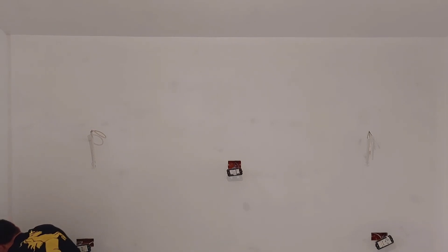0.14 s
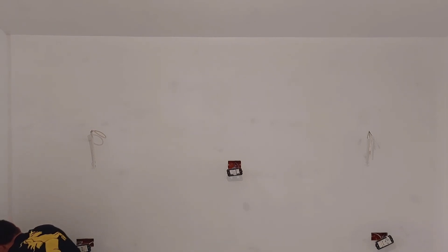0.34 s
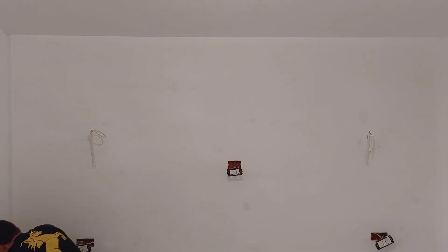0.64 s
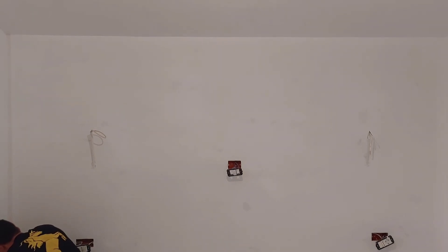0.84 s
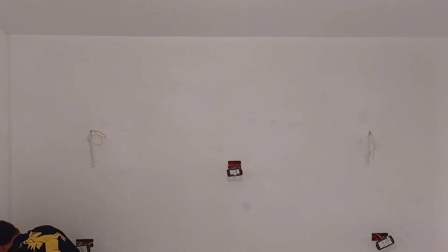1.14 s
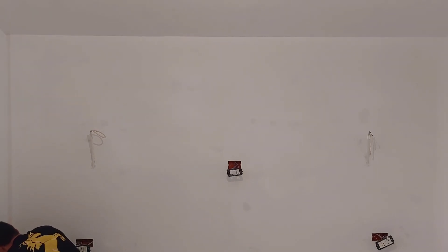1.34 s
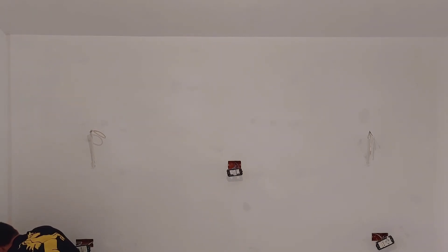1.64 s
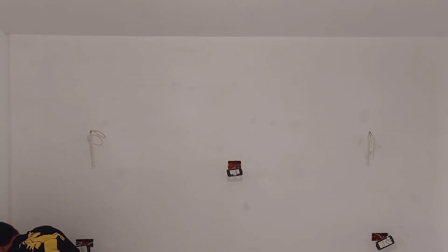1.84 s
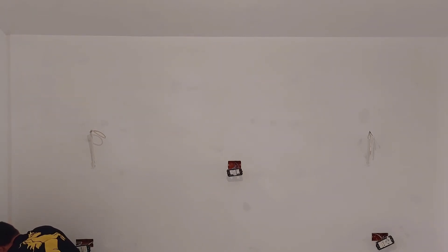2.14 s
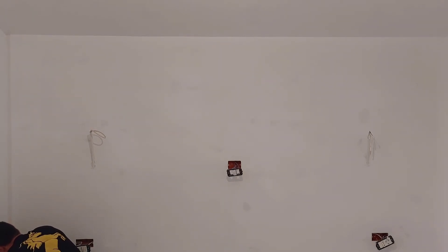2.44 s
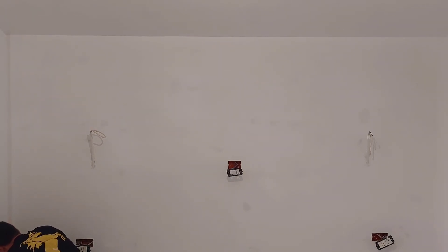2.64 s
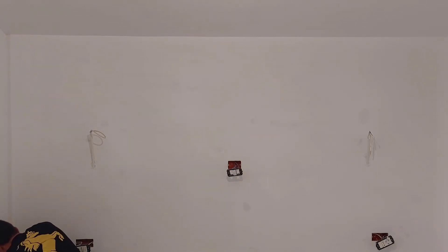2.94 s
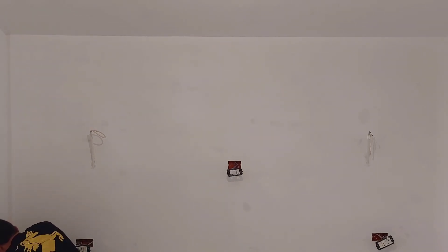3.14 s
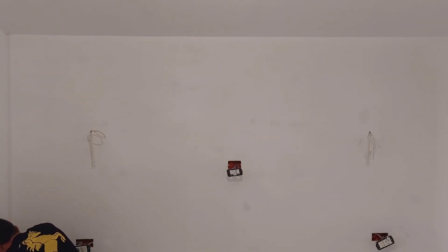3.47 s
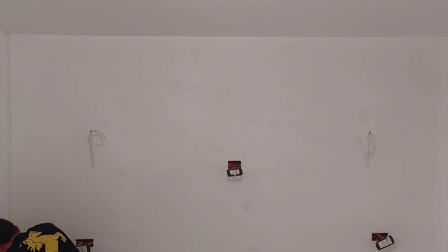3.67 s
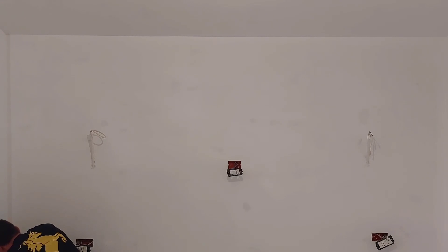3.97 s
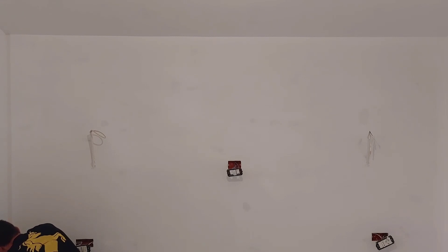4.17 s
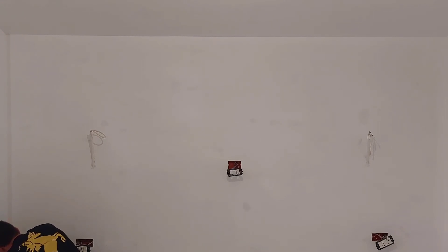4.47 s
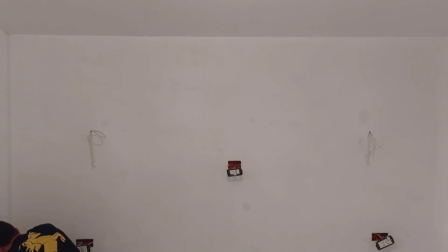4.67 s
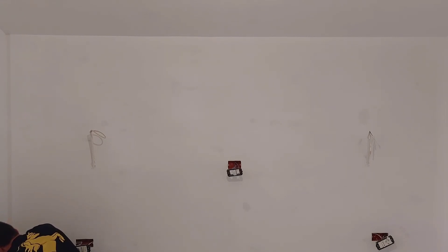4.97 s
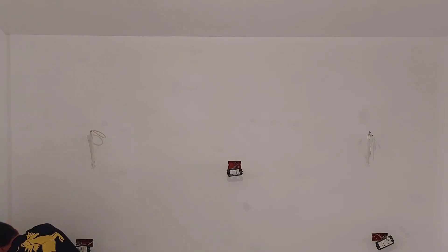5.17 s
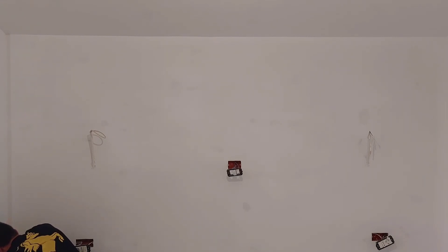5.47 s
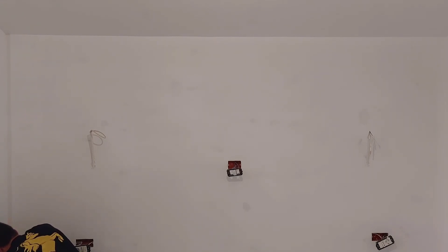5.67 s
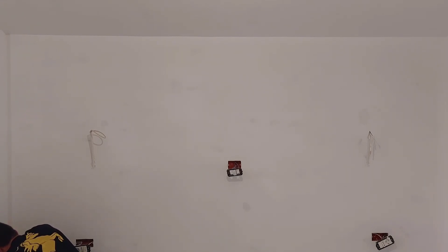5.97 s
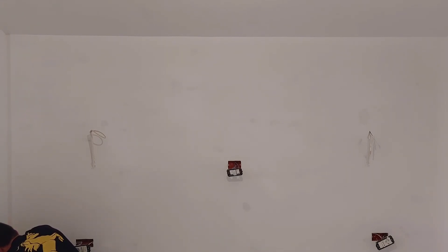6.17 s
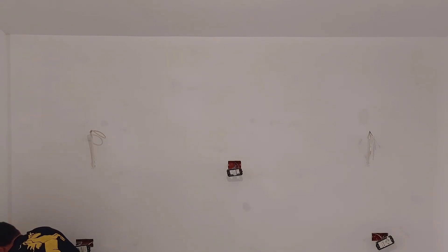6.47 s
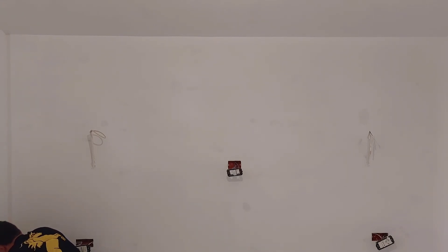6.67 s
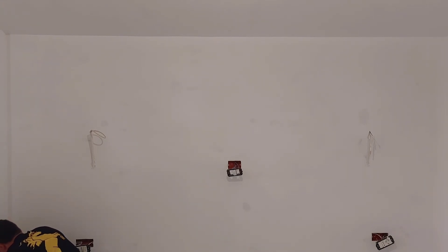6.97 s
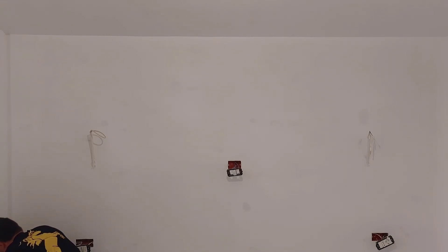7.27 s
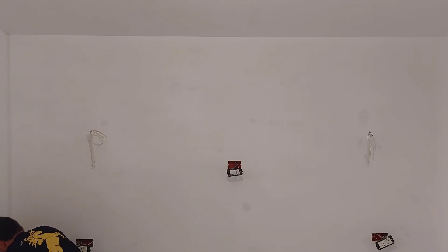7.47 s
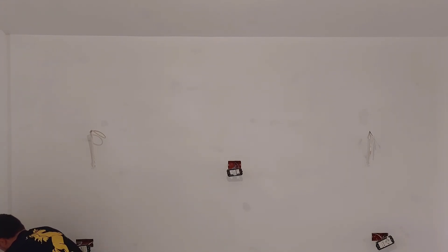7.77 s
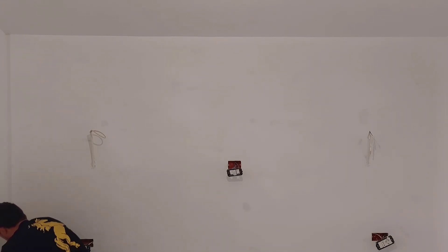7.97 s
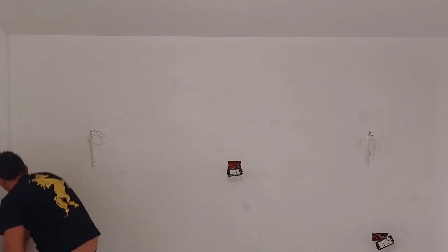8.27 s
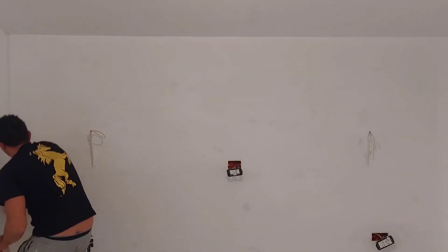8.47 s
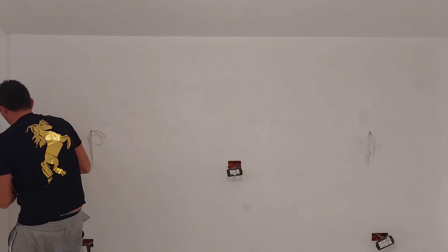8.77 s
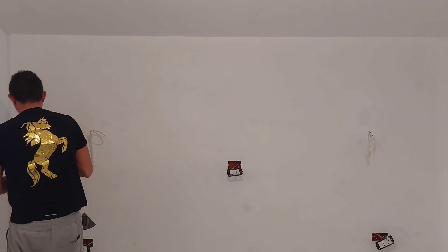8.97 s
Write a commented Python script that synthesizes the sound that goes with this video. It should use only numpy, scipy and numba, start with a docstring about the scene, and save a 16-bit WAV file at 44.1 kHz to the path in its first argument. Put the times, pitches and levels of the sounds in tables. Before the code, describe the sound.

A bare, reverberant room with faint still air, picked up by one phone microphone; its noise suppression shortens the echo tails. A worker crouches low at a wall with masking tape. A faint squeaky remnant opens; at 0.7 s a short fizzing pull rasps. Around 1.9-2.05 s backing crackles and snaps sharply, leaving squeaks and ringing. At 3.15-3.3 s comes a dense, hard burst of rips, then another at 3.6-3.8 s with a hollow roll knock and groan. At 4.9-5.1 s there are light papery cracks, then hoarse squeaky rubbing strokes until about 6.15 s, ended by a sharp snap. Pulls resume from 6.55 s, growing stronger around 6.8-7.25 s; hollow knocks at 7.35 s and a loud rip at 7.52 s ring out, with another knock at 7.86 s. From 8.2 s to about 8.9 s low, dry thuds mark the worker rising and stepping, over faint peeling and squeaks.

```python
"""Bare room with hard walls, low at one wall, one phone microphone: masking tape is jerked off its roll.
Short strips are pulled and rubbed down. The glue lets go in dense tiny fractures that fizz, snap the
backing and shake the taut strip; strip and roll squeak and groan, and the card roll knocks hollowly.
The walls ring on after every pull, built from decaying noise; the worker gets up with a few thuds.
The phone's noise suppressor shortens the tails."""
import sys
import numpy as np
from scipy import signal
from scipy.fft import rfft, irfft, next_fast_len
from scipy.io import wavfile
from scipy.ndimage import uniform_filter1d, minimum_filter1d
from numba import njit

SR = 44100
rng = np.random.default_rng(int(sys.argv[2]) if len(sys.argv) > 2 else 0)


def generate_wav(signal):
    """Clip the signal to [-1, 1] and save it as 16-bit WAV at the path in sys.argv[1]."""
    frames = np.transpose(np.atleast_2d(signal))
    scaled = np.clip(frames, -1, 1) * 32767
    pcm = np.round(scaled).astype(np.int16)
    wavfile.write(sys.argv[1], SR, pcm)


N = 401751
T = np.arange(N) / SR
TOP_HZ = 15800  # top of the microphone's band; squeaks centred above it are left out


def undb(db):
    """Decibels to gain."""
    return 10 ** (np.asarray(db) / 20)


def on_log_axis(hz, points, values):
    """Join points by straight lines over log frequency."""
    return np.interp(np.log(np.maximum(hz, 1)), np.log(points), values)


def colour(x, spectrum, size=2048):
    """Causal minimum-phase filter of unit power gain with the given (f/Hz, level/dB) shape."""
    gain = undb(on_log_axis(np.fft.rfftfreq(size, 1 / SR), *np.transpose(spectrum)))
    cepstrum = irfft(np.log(gain))
    cepstrum[1:size // 2] *= 2  # fold onto positive time
    cepstrum[size // 2 + 1:] = 0
    response = irfft(np.exp(rfft(cepstrum)))
    return signal.fftconvolve(x, response / np.linalg.norm(response))[:len(x)]


def add(track, s, sound):
    """Mix a sound into a track from time s on, cutting what falls outside."""
    start = int(s * SR)
    sound, start = sound[max(-start, 0):], max(start, 0)
    part = track[..., start:start + len(sound)]
    part += sound[:part.shape[-1]]


def wander(hz, size=N, order=4):
    """Complex random motion of unit power, about hz fast."""
    f = np.fft.fftfreq(next_fast_len(size), 1 / SR)
    spectrum = np.exp(2j * np.pi * rng.random(len(f))) / np.sqrt(1 + np.abs(f / hz) ** order)
    z = np.fft.ifft(spectrum)[:size]
    return z / np.std(z)


def resonate(x, modes):
    """Ring a table of steep resonances: f/Hz, width/Hz, level/dB."""
    out = 0
    for hz, width, db in modes:
        peak = signal.iirpeak(hz, hz / width, fs=SR)
        once = signal.lfilter(*peak, x)
        out = out + undb(db) * signal.lfilter(*peak, once)
    return out


# Still air of the house, relative spectrum: f/Hz, level/dB
AIR_TONE = [(15, -70), (25, -37), (59, -5), (175, -17.5), (277, -16), (531, -14), (624, -13), (1890, -20.5),
            (3340, -25.5), (3620, -29.5), (14300, -30), (16000, -56)]
AIR_DB = -51.5  # overall level


def still_air():
    """Steady noise in the colour of the house at rest."""
    return undb(AIR_DB) * colour(rng.standard_normal(N), AIR_TONE)


# Low background noise, course of its level: t/s, level/dB
LOW_NOISE_LEVEL = [(0, -66.5), (4.4, -78), (5.2, -58), (6.3, -52.5), (7.0, -54.5), (7.6, -44), (8.5, -48),
                   (9.1, -68)]
# Its dull colour, relative spectrum: f/Hz, level/dB
LOW_NOISE_TONE = [(25, -10.5), (60, 0), (150, -1), (300, -6), (700, -9.5), (3000, -37), (16000, -52.5)]


def low_noise(flutter_hz=9, flutter_db=2):
    """Dull, uneven low background noise: filtered noise whose level sinks, then rises, and flutters."""
    db = np.interp(T, *np.transpose(LOW_NOISE_LEVEL)) + flutter_db * wander(flutter_hz).real
    return undb(db) * colour(rng.standard_normal(N), LOW_NOISE_TONE)


# Soft rumbles as the worker leans and shifts weight: t/s, length/s, f/Hz, level/dB
LEANS = [(.8, 0.39, 164, -61), (2.46, 0.15, 73.4, -54), (2.58, 0.18, 182, -54.5), (2.75, 0.19, 77, -52),
         (2.8, .19, 183, -55), (8.221, 0.42, 75.2, -45), (8.69, .2, 71, -40.5)]
RUMBLE_WIDTH_HZ = 12


def rumbles():
    """Low swells without a blow: narrow noise under a half-sine."""
    out = np.zeros(N)
    for s, length, hz, db in LEANS:
        t = T[:int(length * SR)]
        ring = wander(RUMBLE_WIDTH_HZ, size=SR)[:len(t)] * np.exp(2j * np.pi * hz * t)
        swell = ring.real * np.sin(np.pi * t / length)
        add(out, s, swell * undb(db) / np.std(swell))
    return out


def bump(hz, rise_cycles):
    """A soft blow on a heavily damped resonance; lower ones swell and fade more slowly."""
    rise = rise_cycles / hz
    t = T[:int(10 * rise * SR)]
    return t / rise * np.exp(1 - t / rise) * np.sin(2 * np.pi * hz * t)


# Dull thuds as the worker shifts, gets up and steps: t/s, f/Hz, level/dB
FLOOR_THUDS = [(4.944, 71, -43), (7.068, 89, -40.5), (7.24, 64, -39.5), (8.272, 89, -23.5),
               (8.335, 80, -29), (8.377, 59, -31), (8.43, 79.5, -37), (8.587, 67.7, -37),
               (8.719, 63.4, -26), (8.78, 55, -26.5), (8.829, 68.2, -32), (8.881, 66.6, -27.5)]
THUD_RISE_CYCLES = 0.42


def thuds():
    """Low damped blows that stay dry, with no wall echo."""
    out = np.zeros(N)
    for s, hz, db in FLOOR_THUDS:
        add(out, s, undb(db) * bump(hz, THUD_RISE_CYCLES))
    return out


# The bare room: f/Hz, t60/s, echo energy/dB against the sound sent to the walls
ROOM_DECAY = [(85, 1.1, -9.5), (180, 2.4, 3), (330, 1.2, 4), (520, 1.8, 0.5), (660, 2.1, -4.5),
              (830, 2.2, -1), (1550, 1.86, 5.5), (2590, 1.525, -2), (5630, 1.405, -0.5), (9300, 0.9, -2.5),
              (15000, 0.6, -9)]


def echoes(first_s=0.0066, build_s=0.015, size=512):
    """Dense wall echoes: noise that builds up after a short gap and decays at each band's own rate."""
    f, t, cells = signal.stft(rng.standard_normal(2 * SR), SR, nperseg=size)
    hz, t60, echo_db = np.transpose(ROOM_DECAY)
    decay = np.log(1000) / on_log_axis(f, hz, t60)[:, None]
    gain = undb(on_log_axis(f, hz, echo_db))[:, None] * np.sqrt(2 * decay / SR)
    tail = signal.istft(cells * gain * np.exp(-decay * t), SR, nperseg=size)[1]
    return tail * (1 - np.exp(-np.maximum(T[:len(tail)] - first_s, 0) / build_s))


def room(x, count=5, shift_s=.045):
    """Hands and strip keep moving, so the sound glides from one pattern of echoes to the next."""
    out = np.zeros(N)
    for place in range(count):
        distance = np.abs((T / shift_s - place) % count - count / 2)
        share = np.cos(np.pi / 2 * np.minimum(distance, 1))
        out += signal.fftconvolve(x * share, echoes())[:N]
    return out


# Hollow knocks of the card roll: t/s, f/Hz, level/dB
ROLL_KNOCKS = [(3.796, 430, -20.5), (3.832, 173, -44.5), (7.328, 454, -13.5), (7.344, 460, -14),
               (7.424, 980, -11), (7.855, 510, -12), (7.869, 189.2, -25), (8.937, 740, -34.5)]
KNOCK_RISE_CYCLES, KNOCK_SEND_DB = 0.82, -6.5


def knocks():
    """Damped blows on the roll; returns the direct sound and what goes to the walls."""
    out = np.zeros(N)
    for s, hz, db in ROLL_KNOCKS:
        add(out, s, undb(db) * bump(hz, KNOCK_RISE_CYCLES))
    return np.array([out, undb(KNOCK_SEND_DB) * out])


# Tape rubbed down with a hoarse squeak, one list a stroke: t/s, level/dB before the gains below, f/Hz
RUB_STROKES = [
    [(4.96, -44, 1453), (5.024, -38, 1486), (5.244, -43, 1446), (5.368, -45.5, 1516), (5.436, -43.5, 1476),
     (5.49, -58, 1487)],
    [(5.63, -59.5, 1450), (5.652, -49, 1432), (5.738, -37.5, 1428), (5.904, -32, 1444), (6.146, -54, 1453),
     (6.16, -46, 1496)],
]
# Resonances of the rubbed tape: multiple of the stroke's f, level/dB
RUB_MODES = [(1, 2), (.75, -14.5), (1.16, -9.5), (2.13, -35)]


def rubbing(width_hz, direct_db, send_db, skirt_hz=450, skirt_db=-20):
    """Uneven friction keeps a few gliding resonances ringing over a faint broad scrape."""
    rings = [wander(width_hz, order=7) for _ in RUB_MODES]
    rings[0] = rings[0] + undb(skirt_db) * wander(skirt_hz, order=7)
    out = np.zeros(N)
    for stroke in RUB_STROKES:
        s, db, hz = np.transpose(stroke)
        phase = 2 * np.pi * np.cumsum(np.interp(T, s, hz)) / SR
        active = (T > s[0]) * (T < s[-1])
        gain = uniform_filter1d(undb(np.interp(T, s, db)) * active, size=900)
        for ring, (multiple, mode_db) in zip(rings, RUB_MODES):
            squeak = (ring * np.exp(1j * multiple * phase)).real
            out += gain * undb(mode_db) * np.sqrt(2) * squeak
    return np.array([undb(direct_db) * out, undb(send_db) * out])


# The dragged strip squeaks, the turning roll groans:
# t/s, length/s, f/Hz, width/Hz, level/dB before the mode levels, room send/dB
SQUEAKS = [(-.05, 0.25, 754, 42, -47.5, -7.5), (.675, 0.069, 13300, 450, -42.5, -8),
           (0.74, 0.23, 907, 64, -45, -4), (0.759, .36, 1275, 120, -43, -9.5),
           (.93, 0.19, 12500, 360, -50, -15), (1.451, .46, 3230, 50, -66, -2.5),
           (1.748, 0.2, 3120, 130, -57, -7), (1.662, 0.31, 4050, 100, -60.5, -5),
           (2.019, 0.069, 530.6, 57, -44, 11.5), (2.02, 0.02, 915, 95, -35, 11),
           (2.201, 0.79, 993, 12, -47.5, -8.5), (2.15, 0.58, 1451, 100, -39.5, -9.5),
           (2.549, .42, 1346, 34, -47, -9), (2.249, 0.64, 1698, 70, -46, -15),
           (2.046, .5, 3240, 28, -45, -8), (2.2, 0.48, 3470, 60, -54.5, -7.5),
           (2.746, .21, 2640, 250, -48, -6), (3.189, .2, 268.7, 31, -48.5, 5),
           (3.68, .13, 402, 69, -31, 0.5), (3.75, 0.84, 379.7, 38, -49, -4.5),
           (3.686, 0.16, 1290, 140, -31, -14), (3.778, 0.51, 1305, 35, -44, -21),
           (3.95, .57, 921, 30, -59, -14.5), (4.922, 0.16, 427, 56, -52, 3.5),
           (4.992, 0.24, 1073, 90, -49, 1), (4.994, 0.4, 1704, 105, -43.5, -17),
           (5.081, 0.32, 3100, 180, -56.5, -2), (5.93, 0.23, 3150, 150, -58, -7),
           (6.19, 0.22, 2680, 230, -39, -10.5), (6.48, 0.32, 2740, 45, -55, -18),
           (6.551, 0.15, 5240, 200, -57, -8), (6.506, .24, 11300, 800, -54, -5),
           (6.68, 0.17, 10300, 750, -49, -5), (6.69, 0.14, 1390, 190, -44, -3.5),
           (6.788, 0.074, 767, 80, -36, -3.5), (6.819, 0.12, 1480, 130, -39, -19),
           (7.018, .079, 2540, 210, -35, -8), (7.24, 0.16, 1018, 95, -28.5, -7),
           (7.367, 0.17, 1050, 100, -35, -26), (7.56, 0.64, 1508, 140, -34.5, -27),
           (7.823, 0.11, 468.8, 108, -27.5, -3), (7.904, 0.46, 2110, 240, -36.5, -10.5),
           (8.239, 0.427, 2095, 83, -46, -10), (8.152, 0.72, 772, 29, -49.5, -9),
           (8.502, 0.14, 640, 36, -49.5, 0), (8.718, 0.23, 1701, 64, -51.5, -0.5),
           (8.925, 0.14, 740, 51, -48.5, 4.5)]
# Resonances of every squeak: multiple of its f, level/dB
SQUEAK_MODES = [(1, 1), (2.049, -16)]
SQUEAK_SAG_PER_S = .025  # share of the pitch lost each second


def singing():
    """Swells of friction in a narrow resonance with a weak overtone; pitch sags as the strip lengthens."""
    out = np.zeros((2, N))
    for s, length, pitch_hz, width_hz, db, send_db in SQUEAKS:
        t = T[:int(length * SR)]
        gliding_hz = pitch_hz * (1 - SQUEAK_SAG_PER_S * (t - length / 2))
        phase = 2 * np.pi * np.cumsum(gliding_hz) / SR
        for multiple, mode_db in SQUEAK_MODES:
            if pitch_hz * multiple > TOP_HZ:
                continue
            motion = wander(width_hz * multiple, size=SR, order=6)[:len(t)]
            ring = motion * np.exp(1j * multiple * phase)
            swell = ring.real * np.sin(np.pi * t / length)
            swell *= undb(db + mode_db) / (np.std(swell) * np.sqrt(2))
            add(out[0], s, swell)
            add(out[1], s, undb(send_db) * swell)
    return out


def fractures(rate, spread_db, catch_hz, catch_db):
    """Glue threads snap at random (rate per s), in clusters as the peel line catches and runs."""
    happens = rng.random(N) < rate / SR
    size = undb(spread_db * np.minimum(rng.exponential(size=N), 4))
    return happens * size * rng.choice([-1, 1], N) * undb(catch_db * wander(catch_hz).real)


def near_echo(burst, shortest_s=.0003, longest_s=0.001, share=0.49):
    """The wall just behind the hands throws back a copy that ripples the direct sound."""
    lag = int(rng.uniform(shortest_s, longest_s) * SR)
    return burst + share * np.pad(burst, (lag, 0))[:len(burst)]


def all_round(burst):
    """Summed over all directions, the ripples in a burst's spectrum even out."""
    even = irfft(np.exp(1j * np.angle(rfft(burst))), len(burst))
    return even * np.std(burst) / np.std(even)


# Relative colours of glue fizz, snapping backing and shaken strip: f/Hz, level/dB
FIZZ_TONE = [(100, -70), (1000, -36), (4000, -11), (6500, -7), (9000, -2.5), (11000, -0.5), (13300, 1.5),
             (15000, -4.5), (16000, -3.5)]
SNAP_TONE = [(100, -67.5), (600, -27.5), (1600, -8.5), (2300, -2), (2900, -3), (3500, -2.5), (4600, -5),
             (5800, -6), (7500, -6), (11000, -13.5), (16000, -28.5)]
BODY_TONE = [(60, -58), (180, -33), (300, -16.5), (500, -10), (620, -4), (760, 4.5), (1000, 3),
             (1450, -2.5), (2000, -11.5), (3200, -19.5), (8000, -51)]
# Resonances of the stretched strip on its roll: f/Hz, width/Hz, level/dB
STRIP_MODES = [(542.7, 31, 11), (770, 46, -0.5), (977, 150, 2), (1305, 180, 6), (1580, 120, -5.5),
               (3020, 260, -2.5)]
# A snapping patch of backing: fixed width, share of its pitch added to the width, room send
RING_WIDTH_HZ, RING_WIDTH_SHARE, RING_SEND_DB = 400, .17, -4


def peel(table, grains, attack, release, body_db):
    """Runs of fractures drive glue, backing and strip, sudden ones ring a patch; gives direct and walls."""
    drive, rings = np.zeros((3, 2, N)), np.zeros((2, N))
    for s, length, level_db, fizz_db, *patch, send_db in table:
        parts_db = level_db + np.array([fizz_db, 0, body_db])
        u = np.arange(int(3 * length * SR)) / (length * SR)
        rise = attack * np.interp(max(parts_db), [-40, -27], [4, 1])  # gentle pulls start slowly
        shape = np.minimum(u / rise, 1) / (1 + np.exp((u - 1 + release) / release * 2))
        run = np.take(grains, int(s * SR) + np.arange(len(u)), mode="wrap") * shape
        run *= np.sqrt(length * SR / (np.sum(run ** 2) + 1e-9))
        for part, db in zip(drive, parts_db):
            burst = run * rng.choice([-1, 1], 2 * SR)[:len(run)]  # a fracture kicks each part either way
            add(part[0], s, near_echo(burst) * undb(db))
            add(part[1], s, all_round(burst) * undb(db + send_db))
        if patch:
            ring_hz, ring_db = patch
            width = RING_WIDTH_HZ + RING_WIDTH_SHARE * ring_hz
            ring = resonate(np.pad(run, (0, len(run))), [(ring_hz, width, 0)])
            ring *= undb(ring_db) * np.linalg.norm(run) / (np.linalg.norm(ring) + 1e-9)
            add(rings[0], s, ring)
            add(rings[1], s, ring * undb(RING_SEND_DB))
    tones = (FIZZ_TONE, SNAP_TONE, BODY_TONE)
    broad = np.array([sum(colour(part[way], tone) for part, tone in zip(drive, tones))
                      for way in range(2)])
    return broad + rings + resonate(drive[2] + 1e-18, STRIP_MODES)  # the offset avoids denormals


@njit
def band(x, hz, width):
    """State-variable band-pass with a moving centre, gain 1 there."""
    y, b, low = np.empty(len(x)), 0., 0.
    for i in range(len(x)):
        g, k = np.tan(np.pi * hz[i] / SR), width / hz[i]
        v = (b + g * (x[i] + 1e-18 - low)) / (1 + g * (g + k))
        b, low, y[i] = 2 * v - b, low + 2 * g * v, k * v
    return y


# Each new grip frees another length of tape with its own peaks and hollows:
# from t/s, sway of the slack tape/octaves, list of (f/Hz, width/Hz, level/dB)
GRIP_MODES = [ (0, 0.013, [(1090, 56, 0), (1920, 180, -10), (2540, 700, -1), (4930, 1700, 2)]),
              (0.599, 0.0098, [(747, 51, 6.5), (1660, 370, -16.5), (3380, 520, -3.5)]),
              (1.6, .004, [(405, 130, -7.5), (528, 43, 4.5), (654, 100, -5), (767, 28, 10.5), (1140, 26, 7),
              (1358, 58, 2), (1680, 120, -0.5), (2480, 5400, -3), (3420, 116, 7), (5240, 190, 3.5)]),
              (3.099, 0.0089, [(508, 99, 9), (1165, 85, 3.5), (1520, 59, 2.5), (2670, 2800, -1.5),
              (6800, 1700, 0.5)]), (4.6, 0.019, [(2670, 540, 0.5), (4000, 520, -7.5), (5230, 970, -6.5)]),
              (6.15, 0.016, [(906, 175, 9.5), (1510, 180, 4.5), (1720, 130, 0.5), (2580, 1400, 3),
              (4750, 1300, -3.5)]), (6.55, 0.044, [(920, 110, 3.5), (1360, 150, 7.5), (2030, 730, -4.5),
              (2700, 270, 5), (3460, 760, -0.5), (5000, 580, 5.5), (7170, 2500, -16)]),
              (7.0, 0.24, [(726, 73, 8), (1404, 100, 3.5), (2570, 230, 7), (4150, 1200, -9),
              (6200, 320, 0.5)]), (7.516, 0.018, [(850, 540, -2), (1560, 150, 1.5), (2200, 550, 1.5),
              (3180, 850, 2), (4560, 910, -0.5)]), (8.15, 0.014, [(2056, 130, -3), (3140, 1150, -9),
              (4680, 1700, 2.5)]), (8.85, .02, [(3240, 700, 5.5)]), ]
SWAY_HZ = 9  # how fast the slack tape flexes


def gripped(sound, size=2048):
    """The free length of tape colours each pull; its peaks and hollows sway as it flexes."""
    out = np.zeros((2, N))
    edges = [max(int(grip[0] * SR), 0) for grip in GRIP_MODES] + [N]
    for (s, sway, modes), start, end in zip(GRIP_MODES, edges, edges[1:]):
        part = np.pad(sound[:, start:end], ((0, 0), (0, size)))
        for hz, width, db in modes:
            centre = hz * 2 ** (sway * wander(SWAY_HZ, size=2 * SR).real)
            centre = np.resize(centre, part.shape[1])
            peak = np.array([band(way, centre, float(width)) for way in part])
            part = part + (undb(db) - 1) * peak
        for track, way in zip(out, part):
            add(track, s, way)
    return out


# Levels in these three tables hold before the strip and grip resonances; fizz is relative to the level.
# The peel line slips on the taut strip:
# t/s, length/s, level/dB, fizz/dB, ring of the backing f/Hz, ring level/dB
TAUT_SLIPS = [(.717, 0.0055, -50, 20.5, 2470, -52.5), (.7258, 0.0064, -25, 16, 2580, -26.5),
              (0.741, 0.0075, -32, 12, 7450, -27), (.754, 0.0074, -33.5, 16, 7650, -21.5),
              (.77, 0.0043, -40, 14.5, 7500, -35), (1.084, .014, -54.5, 11.5, 12200, -41),
              (1.927, 0.012, -35, 10, 11480, -30.5), (2.014, 0.0076, -20, 9, 4070, -19.5),
              (2.0305, 0.0055, -20.5, 12.5, 3400, -31), (3.149, 0.0037, -26.5, 13.5, 11600, -14),
              (3.156, 0.0065, -35.5, 18, 2760, -26.5), (3.184, .0036, -26, 5.5, 5100, -19),
              (3.197, 0.002, -17.5, 9, 5800, -16), (3.2, 0.0041, -25, 3, 4400, -12.5),
              (3.212, 0.0057, -22.5, 6, 2870, -14.5), (3.226, 0.0041, -16.5, 5.5, 2600, -20.5),
              (3.232, 0.0093, -18, 9, 6900, -20.5), (3.236, 0.004, -16.5, 8.5, 6600, -10.5),
              (3.26, 0.0026, -34, 8, 7500, -14.5), (3.277, 0.006, -21.5, 7.5, 1290, -21.5),
              (3.637, 0.0056, -25, 4.5, 3960, -34.5), (3.7102, 0.0087, -28, 7, 1270, -25.5),
              (3.757, 0.0054, -25.5, 8.5, 3820, -34), (3.764, 0.0077, -26, 5, 6850, -29),
              (3.795, .014, -26.5, 1.5, 10500, -24.5), (5.404, 0.0048, -43.5, 16.5, 7730, -50),
              (6.825, 0.0051, -29.5, -4, 5170, -41), (6.8724, 0.0026, -18.5, -7.5, 1370, -22.5),
              (6.9667, 0.0027, -35, 17, 4860, -29.5), (7.221, 0.016, -39.5, 16.5, 2650, -41.5),
              (7.522, 0.0053, -12, 14, 2600, -10)]
# Slack paper backing cracks as it is creased or torn: columns as for the slips
BACKING_CRACKS = [(1.947, 0.01, -39, 3, 3400, -34.5), (1.9655, 0.01, -24.5, 4.5, 2920, -21.5),
                  (1.986, 0.011, -31, 11.5, 2700, -29.5), (2.003, .004, -27, 7, 2390, -24.5),
                  (2.005, 0.0043, -21, 10.5, 2400, -14), (4.9, 0.012, -42, 4, 5000, -40.5),
                  (4.925, 0.0066, -35.5, 2, 2400, -44), (4.944, 0.0026, -32.5, -0.5, 2350, -32),
                  (4.9512, 0.0038, -33, 6, 4200, -25), (4.961, 0.0087, -29, -1, 5210, -28.5),
                  (4.984, .002, -35, -1, 5500, -32), (5.029, 0.0021, -34, 2.5, 5200, -28),
                  (5.082, 0.023, -39.5, 1, 5300, -41), (5.315, 0.0018, -49, 1, 3150, -43),
                  (5.963, .003, -43.5, -18, 3100, -40.5), (6.08, 0.0021, -60, -10, 3100, -38),
                  (6.1674, 0.0028, -16, -3, 2640, -22), (6.19, 0.047, -49.5, 7, 2110, -45.5),
                  (6.242, 0.008, -39, 11, 2460, -30.5), (6.611, 0.0057, -44.5, 6, 2700, -35)]
# Steady peeling and sliding of the tape: t/s, length/s, level/dB, fizz/dB, room send/dB
STEADY_PULLS = [(-.06, .19, -39, -13.5, -2), (.688, 0.031, -53.5, 10.5, 5), (.74, .22, -36, 6, -8.5),
                (.86, 0.25, -50, 10.5, -8), (1.06, 0.14, -56.5, 9.5, -14),
                (2.02, 0.018, -32.5, -10.5, 16.5), (2.765, 0.25, -51, 12, -12), (3.188, 0.046, -25, 9, -2),
                (3.25, 0.037, -32.5, 1.5, 15.5), (3.63, 0.19, -38, 6, -14), (3.722, 0.052, -28.5, 6.5, -8),
                (3.77, 0.12, -38.5, 7, -22), (4.72, .11, -58.5, 11, 3), (5.4, 0.095, -50.5, 7, 1.5),
                (5.55, .65, -61, -0.5, 12), (5.98, 0.19, -58.5, 6, 8.5), (6.2, 0.22, -50, 7, 2.5),
                (6.56, 0.44, -52.5, 1, -4), (6.75, 0.35, -43.5, 1.5, -11), (6.775, 0.051, -45.5, 8, 1.5),
                (7.02, 0.12, -35, 4, 2), (7.09, 0.049, -40, 3, 0), (7.125, 0.063, -36.5, 6, -3),
                (7.222, .19, -35, 8.5, -9), (7.37, 0.13, -56, 12, 17), (7.54, 0.018, -24, 3, 2.5),
                (7.553, 0.047, -19.5, -12, 9.5), (7.7, 0.4, -41, -8, 6.5), (8.18, 0.28, -52, 13.5, 5),
                (8.33, 0.27, -56.5, 13.5, -2), (8.47, 0.2, -51.5, 7.5, -13), (8.93, 0.15, -53.5, -2, 5)]
SLIP_BODY_DB, CRACK_BODY_DB, PULL_BODY_DB = -3.5, -22.5, -5  # how much each shakes the strip, re its level
SLIP_SEND_DB, CRACK_SEND_DB = 1, 0  # share of the sudden sounds that goes to the walls


def tape():
    """Slips start fast and die away; cracks swell briefly; strong pulls start fast, gentle ones swell."""
    slips = peel([(*row, SLIP_SEND_DB) for row in TAUT_SLIPS],
                 fractures(rate=11000, spread_db=-5.0, catch_hz=400, catch_db=5.0),
                 attack=0.19, release=1.0, body_db=SLIP_BODY_DB)
    cracks = peel([(*row, CRACK_SEND_DB) for row in BACKING_CRACKS],
                  fractures(rate=6800, spread_db=-0.5, catch_hz=400, catch_db=5.5),
                  attack=1.0, release=1.0, body_db=CRACK_BODY_DB)
    pulls = peel(STEADY_PULLS, fractures(rate=5000, spread_db=1.5, catch_hz=90.5, catch_db=2.0),
                 attack=0.11, release=0.58, body_db=PULL_BODY_DB)
    return gripped(slips + cracks + pulls)  # all of them fade out


def scene():
    """Tape, roll and hands in the room, heard by one microphone: both channels are alike."""
    direct, to_walls = tape() + knocks() + singing() + rubbing(width_hz=107, direct_db=-1.0, send_db=-11)
    background = still_air() + low_noise() + rumbles() + thuds()
    return np.tile(direct + room(to_walls) + background, (2, 1))


# Level under which the suppressor closes, against its smoothed band power: f/Hz, level/dB
SUPPRESSOR_THRESHOLD = [(60, -67.5), (400, -74.5), (1200, -68.5), (3500, -78), (12000, -78.5)]


def suppress(x, depth_db, knee, size=512):
    """Bands that sink under the threshold are turned down, so tails fall ever faster."""
    overlap = size * 3 // 4
    f, _, cells = signal.stft(x, SR, nperseg=size, noverlap=overlap)
    power = np.abs(cells) ** 2 * 3 * size / SR
    power = uniform_filter1d(power, size=9, axis=0)
    power = uniform_filter1d(power, size=9, axis=1)
    threshold = undb(on_log_axis(f, *np.transpose(SUPPRESSOR_THRESHOLD)))[:, None] ** 2
    excess = (np.maximum(power, 1e-20) / threshold) ** knee
    gain = (undb(depth_db) + excess) / (1 + excess)
    return signal.istft(cells * gain, SR, nperseg=size, noverlap=overlap)[1][:N]


CEILING_DB = 2  # re full scale; peaks above it are turned down


def limit(x, size=128):
    """Look-ahead limiter: the gain dips for a few milliseconds round each peak above the ceiling."""
    gain = np.minimum(undb(CEILING_DB) / (np.abs(x) + 1e-9), 1)
    return x * uniform_filter1d(minimum_filter1d(gain, size=size), size=size)


def record(dry):
    """The phone cuts rumble, suppresses quiet noise, limits the peaks and cuts the top."""
    x = signal.sosfilt(signal.butter(2, 38, "high", fs=SR, output="sos"), dry)
    x = limit(np.array([suppress(channel, depth_db=-16.5, knee=1.32) for channel in x]))
    return signal.sosfilt(signal.ellip(10, .2, 80, TOP_HZ, fs=SR, output="sos"), x)


dry = scene()
out = record(dry)
generate_wav(out)
```